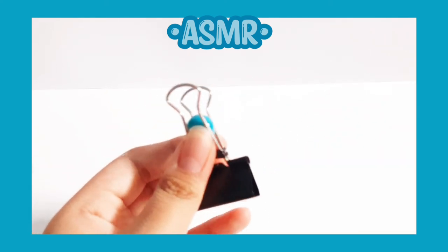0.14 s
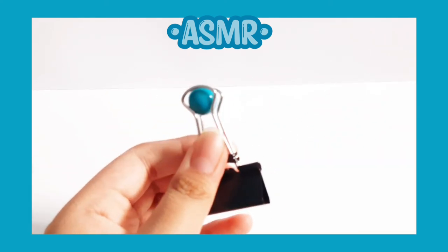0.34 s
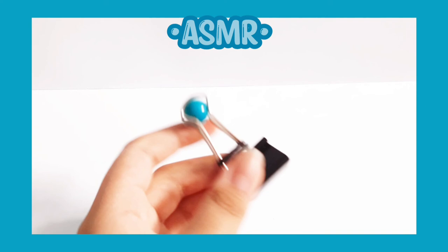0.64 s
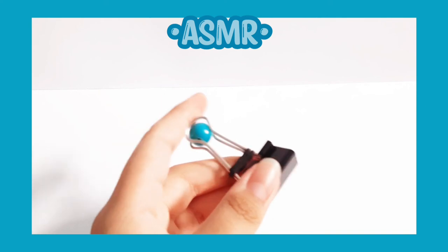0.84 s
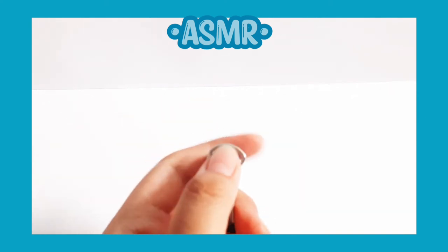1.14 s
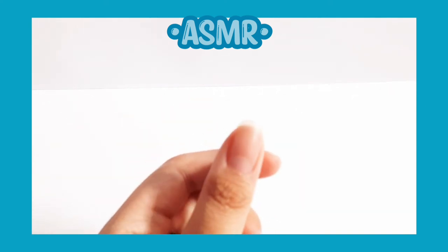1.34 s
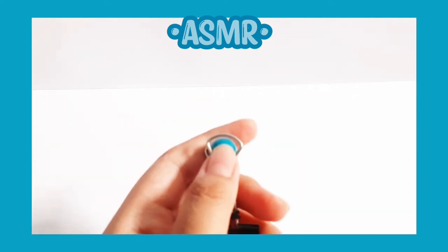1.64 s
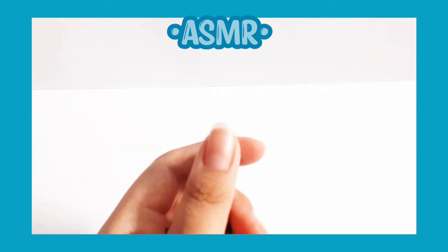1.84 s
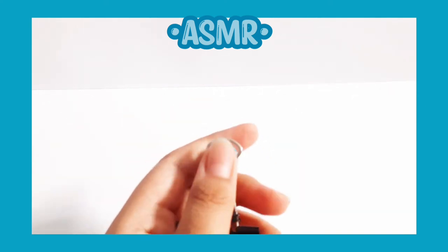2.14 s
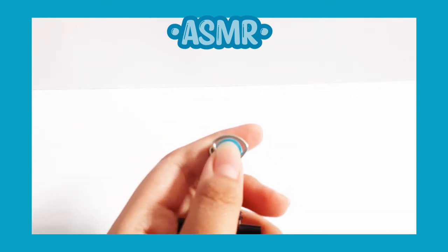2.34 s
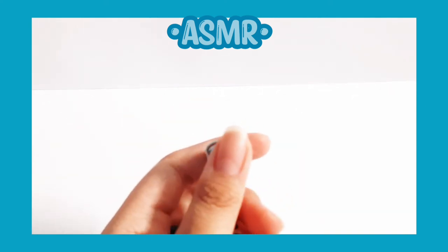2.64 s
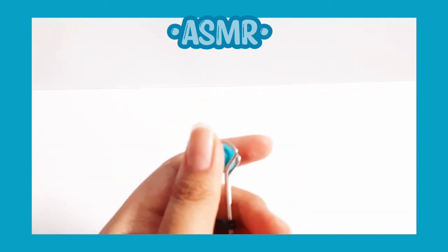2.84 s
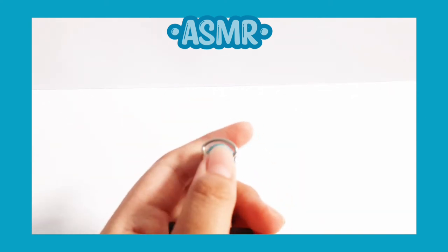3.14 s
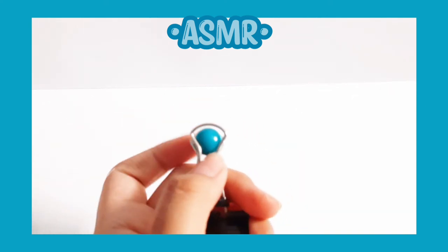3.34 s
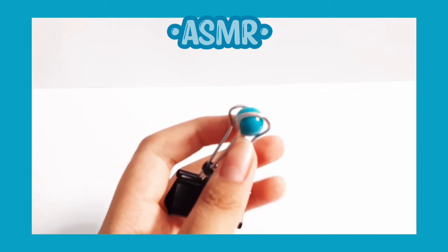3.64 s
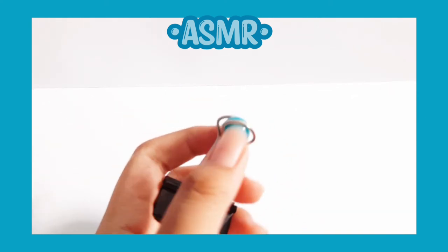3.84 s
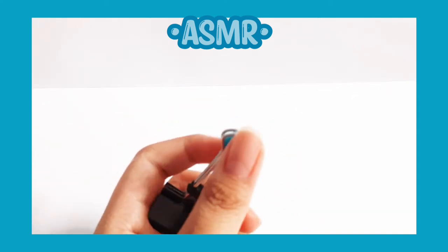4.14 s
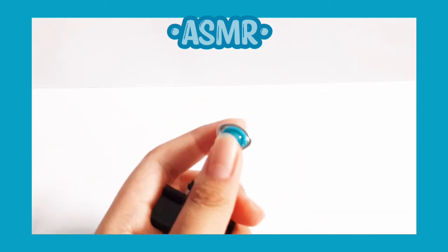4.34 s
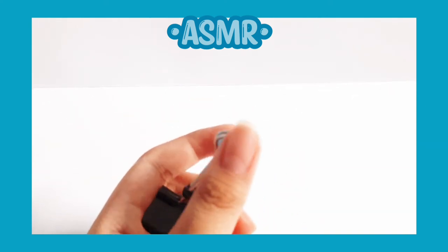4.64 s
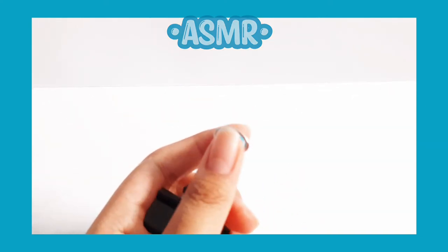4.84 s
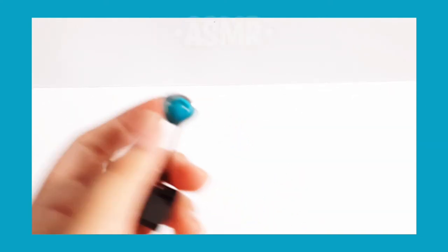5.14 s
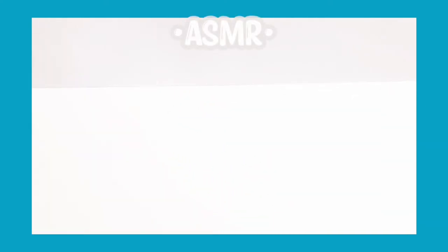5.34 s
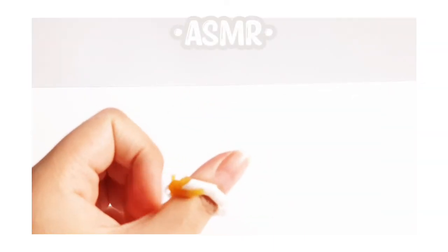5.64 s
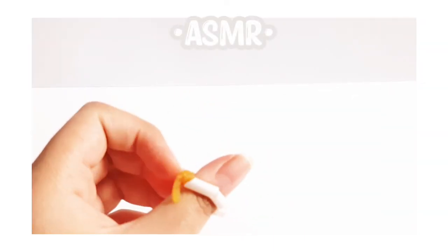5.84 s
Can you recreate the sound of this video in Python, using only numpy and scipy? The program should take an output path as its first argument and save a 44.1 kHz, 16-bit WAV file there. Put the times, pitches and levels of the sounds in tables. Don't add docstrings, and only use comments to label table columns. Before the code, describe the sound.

Very close to the microphone, fingers push a plastic bead between a clamp's wire handles. A loud bright snap comes first, then two weaker clicks, a quiet passage of tiny grainy scrapes and faint ticks, then three firm clicks and a few soft ones. Each wire ring is damped almost instantly, with a brief hard-room tail. Very faint appliance hum and air sit underneath.

```python
import sys
import numpy as np
from scipy import signal
from scipy.fft import rfft, irfft, next_fast_len
from scipy.io import wavfile
from scipy.ndimage import map_coordinates

SR = 44100
rng = np.random.default_rng(int(sys.argv[2]) if len(sys.argv) > 2 else 0)


def pcm_store(signal):
    levels = np.round(np.clip(np.atleast_2d(signal), -1, 1) * 32767)
    wavfile.write(sys.argv[1], SR, levels.astype(np.int16).T)


def to_linear_factor(level_db):
    exponent = np.asarray(level_db, float) / 20
    return 10 ** exponent


N = 264159


def unit(x):
    return x / np.sqrt(np.mean(x ** 2) + 1e-20)


def along(points, hz):
    f, v = np.transpose(points)
    return np.interp(np.log(hz + 1), np.log(f + 1), v)


def wobble(rate):
    knots = rng.standard_normal(int(N * rate / SR) + 4)
    return map_coordinates(knots, [np.arange(N) * rate / SR])


def swing(rows):
    s, db = np.transpose(rows)
    curve = np.interp(np.arange(N) / SR, s, db)
    return curve - curve.mean()


def filtered(x, response):
    m = next_fast_len(len(x) + 8192)
    return irfft(rfft(x, m) * response(np.fft.rfftfreq(m, 1 / SR)), m)[:len(x)]


def shaped(noise, points):
    return unit(filtered(noise, lambda hz: to_linear_factor(along(points, hz))))


def resonances(peaks):
    def response(f):
        total = 0
        for k, (centre, width, db) in enumerate(peaks):
            loss = 1j * f * width
            total = total + (-1) ** k * to_linear_factor(db) * loss / (centre * centre - f * f + loss)
        return total
    return response


def add(track, s, sound):
    part = track[round(s * SR):][:len(sound)]
    part += sound[:len(part)]


def tone(hz, drift, unsteady_db):
    level = np.sqrt(2) * to_linear_factor(unsteady_db * wobble(2.6))
    phase = 2 * np.pi * hz * np.arange(N) / SR + drift * wobble(0.96)
    return level * np.sin(phase + rng.uniform(0, 2 * np.pi))


def house():
    # t/s, level/dB
    load = [(0.0, -58), (0.43, -58.5), (0.85, -60), (1.23, -57.5), (1.43, -58), (1.92, -58.5), (2.38, -60),
            (2.83, -60), (3.49, -58), (3.87, -55), (3.99, -57), (4.44, -54), (4.77, -56), (5.15, -55),
            (5.7, -58.5), (5.99, -58.5)]
    # t/s, level/dB
    flow = [(0.0, -79), (1.87, -81.5), (2.02, -78), (2.69, -79), (3.14, -79.5), (3.64, -79.5), (3.99, -77),
            (4.35, -77.5), (4.85, -78.5), (5.25, -78.5), (5.41, -78.5), (5.99, -82)]
    # t/s, level/dB
    draw = [(0.0, -59), (0.98, -61.5), (1.23, -57.5), (1.43, -56.5), (2.07, -58.5), (2.59, -64),
            (3.28, -62), (3.62, -57), (3.84, -56), (4.37, -58.5), (4.49, -55), (5.02, -63), (5.72, -59),
            (5.99, -58.5)]
    # f/Hz, level/dB per Hz
    rumble_colour = [(25, -35.5), (42, -5.5), (62, -8.5), (144, -7), (185, -2), (290, -5.5), (520, -23),
                     (1000, -86.5)]
    # f/Hz, width/Hz, level/dB
    duct_modes = [(448.2, 240, -9.5), (748, 54.1, 4), (822, 79, 2), (1050, 190, -7), (1340, 200, -12.5),
                  (1940, 180, -17.5), (2590, 500, -19.5)]
    # f/Hz, level/dB per Hz
    hiss_colour = [(710, -39.5), (1200, -15), (1560, -4.5), (1770, -7), (2900, -20.5), (4800, -15.5),
                   (14000, -15), (16000, -20.5)]
    # multiple of shaft speed, level/dB rms
    orders = [(3, -63), (4, -70), (5, -64), (6, -70), (7, -62), (8, -67)]
    # f/Hz, level/dB rms
    hum_lines = [(47.6, -65.5)]
    shaft_hz, mains_hz = 36.93, 99.9

    load_db, flow_db = swing(load), swing(flow)
    rumble_db = -58 + 1.3 * load_db
    mains_db = -58.5 + 1.5 * swing(draw)
    duct_db = -67.5 + 0.21 * flow_db + 0.6 * load_db
    grille_db = -77.5 + 1.8 * flow_db

    noise = rng.standard_normal((4, N))
    rumble = to_linear_factor(rumble_db - 2.0 + 2.0 * wobble(12)) * shaped(noise[0], rumble_colour)
    duct = to_linear_factor(duct_db + 1.1 * wobble(7)) * unit(filtered(noise[1], resonances(duct_modes)))
    hiss = to_linear_factor(-75.5) * shaped(noise[2], hiss_colour)
    whistle = resonances([(1462, 52, -0.5), (1600, 150, -4.5)])
    grille = to_linear_factor(grille_db - 1.0) * unit(filtered(noise[3], whistle))
    fan = sum(to_linear_factor(db - 2) * tone(k * shaft_hz, drift=0.34, unsteady_db=-2.5) for k, db in orders)
    hum = sum(to_linear_factor(db) * tone(hz, drift=0.4, unsteady_db=-5.5) for hz, db in hum_lines)
    hum *= to_linear_factor(0.57 * (mains_db + 59))
    mains = to_linear_factor(mains_db) * tone(mains_hz, drift=0.46, unsteady_db=-1.1)
    return rumble + duct + grille + hiss + fan + hum + mains


def thuds():
    # t/s, peak level/dB, f/Hz, length/cycles
    knocks = [(.293, -36, 329.9, .35), (3.753, -47.5, 109.1, 1.1), (3.914, -40, 214.3, 0.42),
              (3.915, -55, 645, 2.2), (3.926, -36.5, 150, 0.39), (4.3, -32.5, 236, 0.42),
              (4.311, -36, 150, 0.39), (4.327, -41, 264, .8), (4.35, -41, 200, .38),
              (4.489, -45.5, 200, 1.2), (5.016, -51, 181, 0.56), (5.108, -49, 298, 0.85)]
    # f/Hz, level/dB per Hz
    rustle_colour = [(100, -5.5), (300, 1), (700, -14.5), (1300, -17.5), (2200, -32.5), (4000, -70)]
    rustle_db, rustle_s = -19, 0.03493
    out, t = np.zeros(N), np.arange(-2048, 2048) / SR
    rustle_fade = np.exp(-(t / rustle_s) ** 2 * np.where(t < 0, 9, 2))
    for s, db, hz, cycles in knocks:
        low = -np.sin(2 * np.pi * hz * t) * np.exp(-(t * hz / cycles) ** 2)
        rustle = shaped(rng.standard_normal(len(t)), rustle_colour) * rustle_fade
        add(out, s - 2048 / SR, to_linear_factor(db) * (low + to_linear_factor(rustle_db) * rustle))
    return out


def room(sound, wet_db, spread=None):
    # f/Hz, t60/s
    decay = [(1000, .36), (2500, .36), (5000, .37), (8000, 0.4), (11500, .29), (16000, .23)]
    # delay/s, level/dB
    walls = [(.0117, -15), (.0145, -15), (.0207, -11), (.025, -12), (.028, -14), (.0325, -15)]
    hz, t, z = signal.stft(rng.standard_normal(SR // 2), SR, nperseg=256)
    fade = to_linear_factor(-60 * t * (1 + t / 0.41) / along(decay, hz)[:, None])
    tail = signal.istft(z * fade, SR, nperseg=256)[1][:SR // 2]
    t = np.arange(len(tail)) / SR
    tail *= 1 - np.exp(-(t / 0.011) ** 2)
    tail /= np.linalg.norm(tail)
    answer = tail * (1 if spread is None else 0.3)
    for delay, db in walls:
        answer[round(delay * SR)] += to_linear_factor(db - 0.04 + rng.normal(0, 0.72))
    answer *= to_linear_factor(wet_db)
    answer[0] = 1
    heard = signal.fftconvolve(sound, answer)
    if spread is not None:
        diffuse = filtered(tail, spread)
        diffuse /= np.linalg.norm(diffuse)
        add(heard, 0, to_linear_factor(wet_db) * np.linalg.norm(sound) * diffuse)
    return heard


def slips():
    # t/s, level/dB, length/s, brightness/dB, depth/dB
    slides = [(0.285, -58, 0.0021, 4.5, -22.5), (1.517, -68, 0.0019, 2, 2), (1.559, -70.5, 0.016, -18, -3),
              (1.603, -82, 0.023, -2, 6), (1.671, -70, 0.017, -5.5, -5), (1.692, -74, 0.0045, -8, 0),
              (1.744, -86, 0.034, -10, 7), (1.849, -64.5, 0.014, -6, -1), (2.32, -80, .015, -3, -4),
              (3.149, -76, .012, 0, -12), (5.4, -81.5, 0.019, 3, -3), (5.506, -77, .003, -9, -1.5),
              (5.573, -76, .004, -6, -5)]
    # f/Hz, width/Hz, level/dB
    held_deep = [(2580, 460, 0)]
    held_low = [(3310, 210, 6.5), (4230, 830, 1.5)]
    held_high = [(5700, 810, -14), (7500, 1100, -11)]
    lead_s = 0.04
    out, t = np.zeros(N), np.arange(4096) / SR - lead_s

    def through(grains, peaks):
        return unit(filtered(grains, lambda hz: resonances(peaks)(hz) ** 2))

    for s, db, length, bright_db, deep_db in slides:
        grains = rng.standard_normal(len(t)) * to_linear_factor(2.5 * rng.standard_normal(len(t)))
        wire = to_linear_factor(deep_db) * through(grains, held_deep) + through(grains, held_low)
        wire = wire + to_linear_factor(bright_db) * through(grains, held_high)
        burst = to_linear_factor(db) * np.exp(-2 * (t / length) ** 2) * wire
        add(out, s - lead_s, room(burst, wet_db=-7.5))
    return out


def all_round(modes):
    def spread(hz):
        power = 0
        for centre, db, t60, side_db in modes:
            peak_db = db + 14 * np.log10(t60 / 0.015) + 0.6 * np.log2(centre / 3400) + side_db
            width = 90.06 + 4.3 / t60
            power = power + to_linear_factor(2 * peak_db) / (1 + ((hz - centre) / width) ** 2) ** 2.8
        return np.sqrt(power)
    return spread


def snaps():
    # t/s, blow level/dB, contact time/s, grip closing time/s,
    # room level/dB
    blows = [(0.2916, 5.5, .0005, 0.0042, -9.5), (0.9691, -17, 0.00059, 0.0061, -12.5),
             (1.2363, -25.5, .0007, 0.0072, -12), (1.7158, -47.5, 0.00091, 0.0033, -17),
             (1.8565, -34, .00042, 0.0053, -13.5), (2.170, -35, 0.00046, .0049, -11),
             (2.778, -51.5, .00055, 0.005, -10), (3.1557, -12, 0.001, 0.0026, -12),
             (3.5255, -12.5, 0.00073, 0.0066, -13), (4.1687, -9, 0.0013, 0.0019, -13.5),
             (4.9927, -32, 0.00078, 0.0046, -10), (5.5208, -43.5, .0006, .0032, -11)]
    # f/Hz, level/dB, t60/s, level sent sideways to the walls/dB
    open_hold = [(150, -41, 0.027, -9), (475, -29.5, 0.0045, -5.5), (754, -29.5, .014, -9.5),
                 (1350, -26, 0.0071, 0), (1713, -26, .012, 3.5), (2150, -26, .01, 4.5),
                 (2795, -27, .013, 3), (3510, -24, .022, 0.5), (4640, -3, 0.01, -8),
                 (5060, -4.5, .0068, 4.5), (5906, -8, .008, 7.5), (6827, -14.5, 0.015, 8.5),
                 (8420, -10.5, .0046, 9), (9700, -14.5, 0.012, 5.5), (11120, -15.5, .012, 4),
                 (12880, -24.5, .25, 0.5), (14080, -14.5, 0.0045, 1), (15130, -13, 0.0039, -3)]
    pinched = [(1500, -35, 0.013, 2), (2396, -13.5, 0.026, 9), (3480, -1.6, 0.018, 4.5),
               (4840, -14.5, 0.01, 2), (5500, -3.5, .005, -3), (6880, -5.5, 0.01, 0.5),
               (8050, -2.5, 0.004, -12), (9600, -5.5, 0.009, 2), (10940, -20, .025, 6),
               (12800, -23, .012, -2), (15445, -31, .012, -6)]
    covered = [(2500, -10, .041, 2.5), (3310, 2, .024, -1), (4130, -7, 0.012, -4), (4900, -8, .009, -10),
               (5600, -17.5, .013, -1), (7500, -20.5, 0.023, 2), (9900, -34, .008, 0),
               (12500, -42, .006, 0)]
    cupped = [(2600, -10, 0.043, 3), (3484, 4.5, 0.015, 7), (4180, -7.5, 0.012, -2),
              (5400, -12.5, .009, -4), (6860, -17, .014, 0), (9100, -29, .008, 0)]
    pressed = [(2760, -13, 0.036, 3), (3413, 3.5, .017, 0), (5050, -25, .011, -3), (7300, -6, .01, -2),
               (8900, -38, .01, 0)]
    squeezed = [(1960, -28, 0.0091, 3), (2656, -2, .015, 0), (2970, -19, .017, 9), (3370, 0, 0.017, 2.5),
                (4400, -13, .0066, -7), (5820, -6.5, 0.0088, 1.5), (6200, -15, .008, 0),
                (7120, -7.5, 0.0084, -4), (9160, -16.5, 0.0096, -3), (10900, -19.5, 0.013, 6),
                (13660, -36, .011, 0), (15710, -39, .011, 0)]
    lifted = [(1700, -41.5, 0.037, -6), (3280, -11, 0.027, 2), (4434, -1.3, 0.024, -3),
              (5730, -7.5, 0.0067, 8), (6460, -3.5, 0.01, -1), (7970, -4.3, 0.0066, -6),
              (9080, -17, .011, 2), (9900, -22, 0.022, 6), (11100, -25, 0.008, 3), (13000, -33, .008, 0),
              (15700, -34, .01, 0)]
    tilted = [(3435, -8, 0.019, 3), (4155, 4, 0.016, -3), (5660, -10, 0.017, 0), (7600, -20, 0.012, 4),
              (8700, -14.5, 0.0064, -4), (11300, -32, .01, 4), (13100, -35, .012, 0), (14900, -42, .01, 0)]
    slack = [(2550, -3, 0.035, 5), (3600, -2, 0.01, -1), (4180, -0.5, .009, -4), (4950, -2, 0.0067, 3),
             (6950, -9.5, .015, -1), (7570, -8.5, .012, -1), (9000, -13, .01, 0), (11000, -23, .008, 0),
             (14500, -28, .006, -6)]
    ring_only = [(3350, -17, .012, -9), (5900, -12, .012, -6), (9100, -5, 0.01, 3), (12540, -13, .01, 0),
                 (14100, -10, .008, -6), (15400, -9, .008, -6)]
    holds = [open_hold, pinched, covered, cupped, cupped, pressed,
             cupped, squeezed, lifted, tilted, slack, ring_only]
    rattle_db, rattle_t60 = -7, 0.016
    out, t = np.zeros(N), np.arange(4096) / SR
    for (s, db, contact, closing, wet_db), modes in zip(blows, holds):
        damping = -60 * t * (0.37 + t / closing)
        ring = sum(to_linear_factor(level + damping / t60) * np.sin(2 * np.pi * hz * t) for hz, level, t60, _ in modes)
        below, above = (0.88 * modes[0][0], -70), (1.15 * modes[-1][0], -70)
        reach = [below] + [mode[:2] for mode in modes] + [above]
        rattle = shaped(rng.standard_normal(len(t)), reach)
        blow = ring + to_linear_factor(rattle_db + damping / rattle_t60) * rattle
        blow *= 1 - np.exp(-(t / contact) ** 2)
        add(out, s, room(to_linear_factor(db - 3.5) * blow, wet_db, all_round(modes)))
    return out


def scene():
    return (snaps() + slips() + thuds() + house())[None]


def top_cut(x):
    return signal.sosfilt(signal.butter(12, 16150, fs=SR, output="sos"), x)


def record(dry):
    # t/s, half length/s, depth/dB
    dips = [
        (0.9661, 0.0032, -31),
        (5.43, 0.0039, -10),
    ]
    t = np.arange(N) / SR
    wet = dry * to_linear_factor(sum(db * np.exp(-((t - s) / half) ** 4) for s, half, db in dips))
    step_s = 5.4355
    wet = wet + to_linear_factor(-42) * (t > step_s) * np.exp(-np.abs(t - step_s) / 0.0012)
    clipped = np.clip(wet[0], -1, 1)
    mix = filtered(clipped, lambda hz: to_linear_factor(np.interp(hz, [15800, 16700], [0, -45])))[None]
    return top_cut(mix)


dry = scene()
out = record(dry)
pcm_store(out)
```